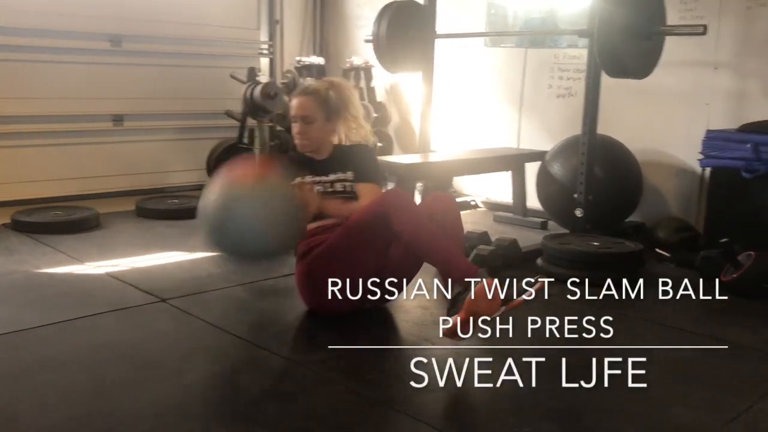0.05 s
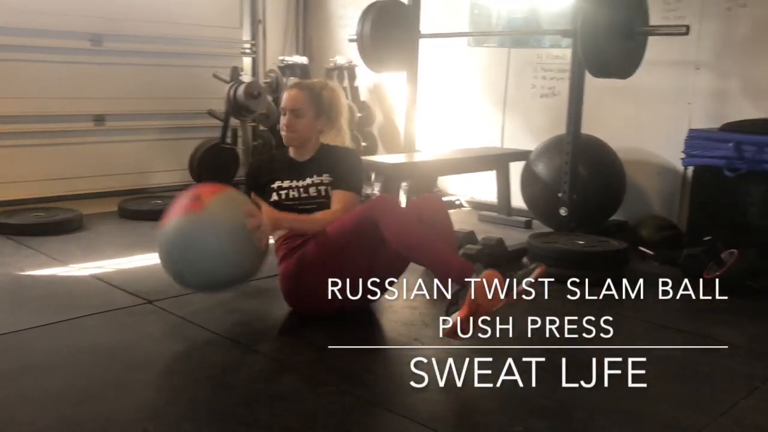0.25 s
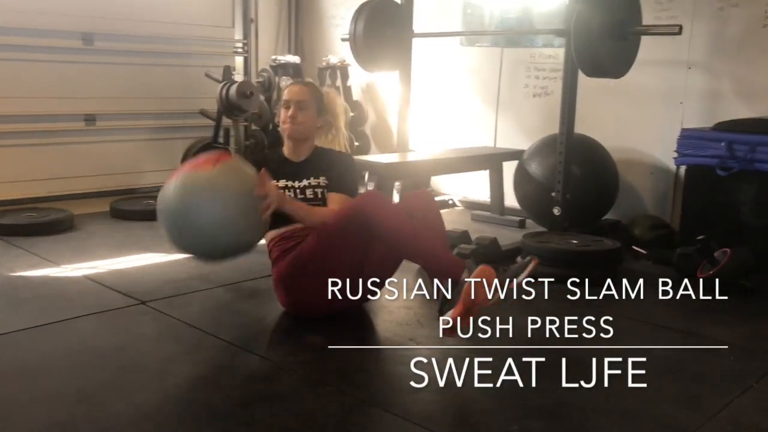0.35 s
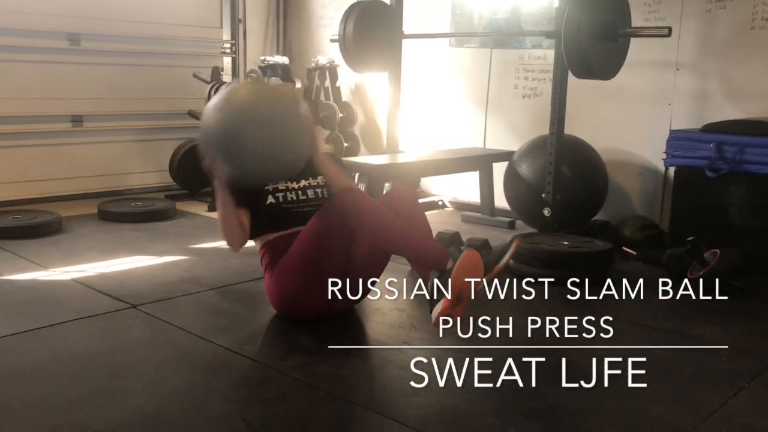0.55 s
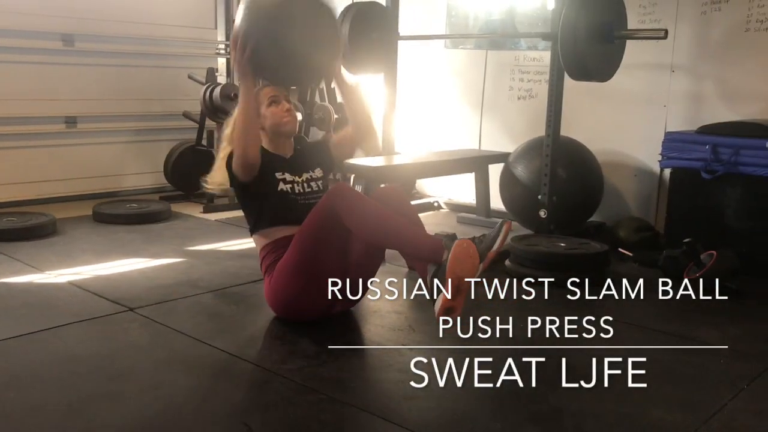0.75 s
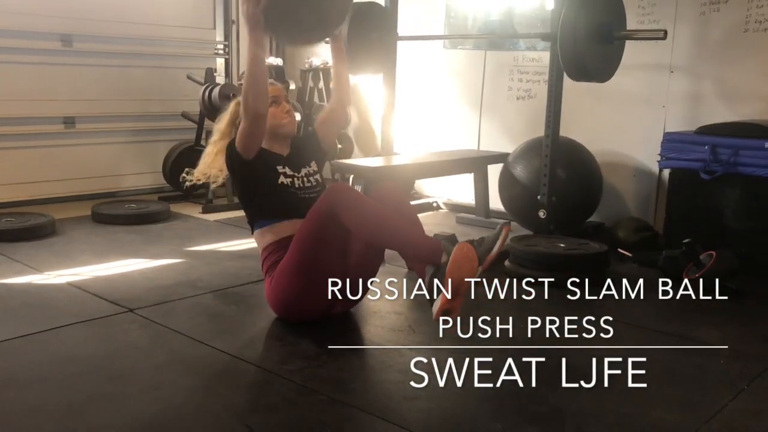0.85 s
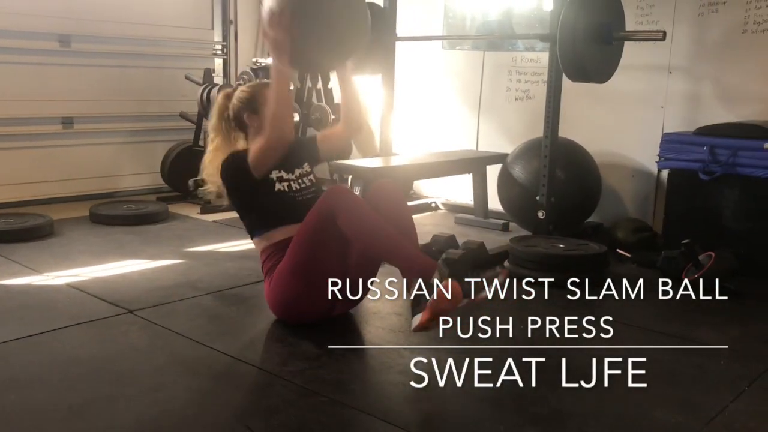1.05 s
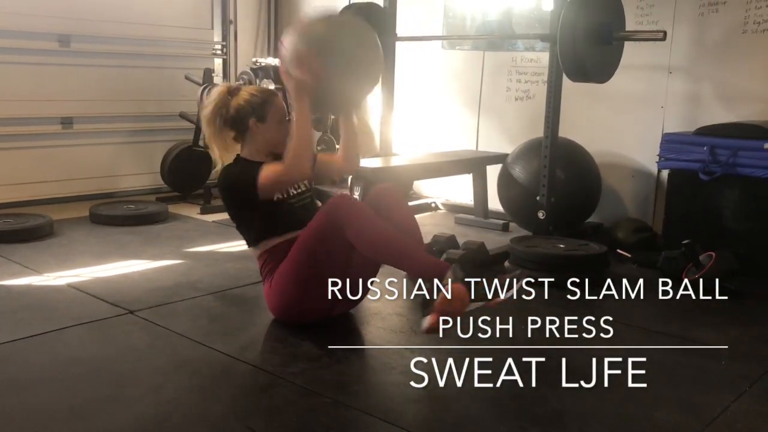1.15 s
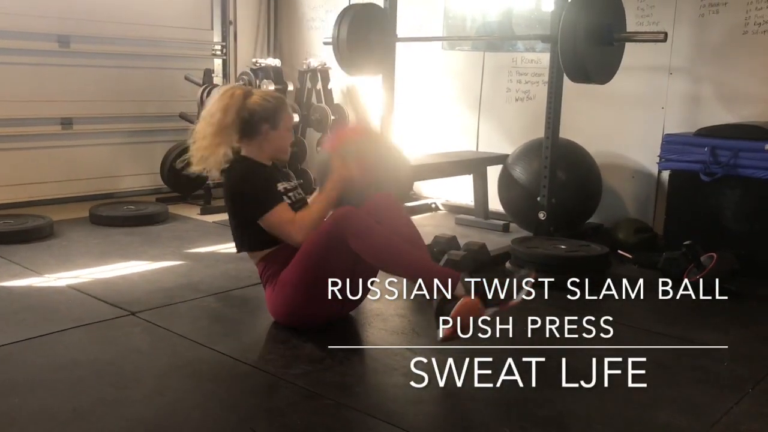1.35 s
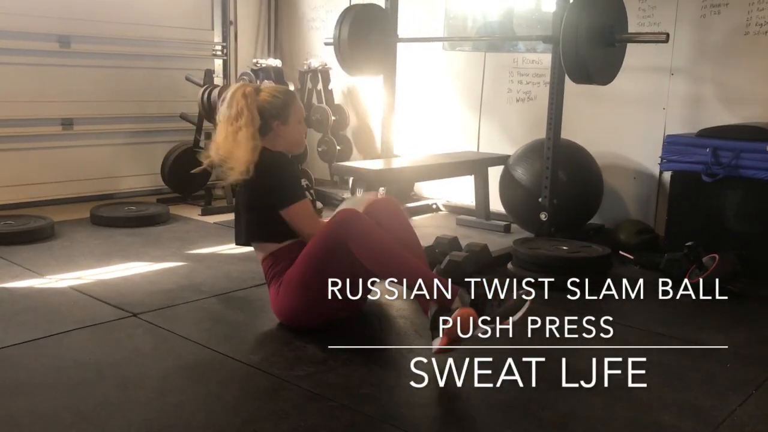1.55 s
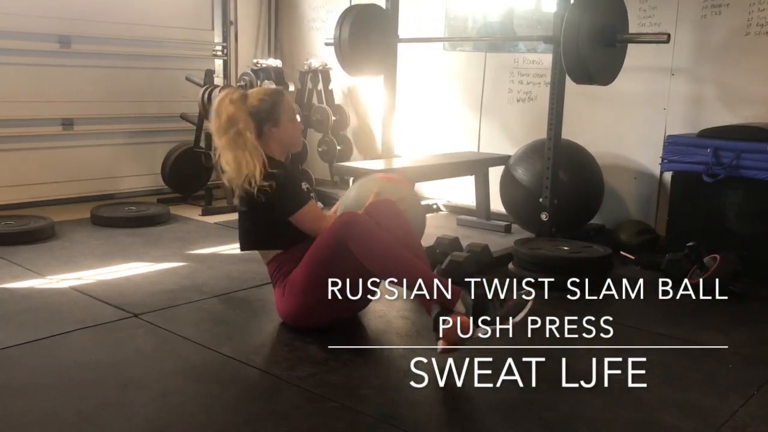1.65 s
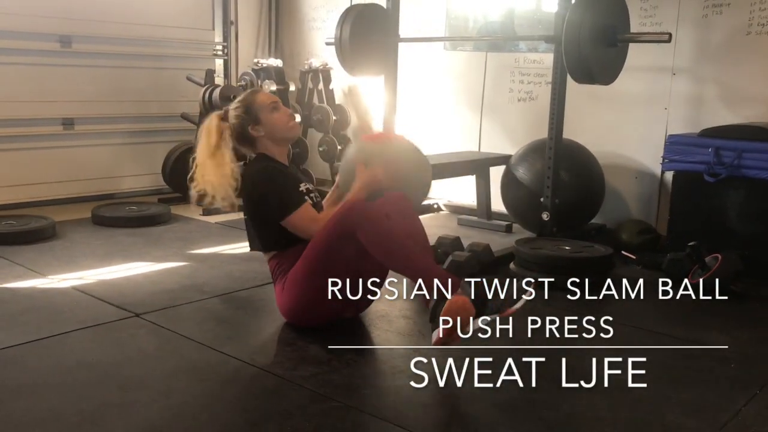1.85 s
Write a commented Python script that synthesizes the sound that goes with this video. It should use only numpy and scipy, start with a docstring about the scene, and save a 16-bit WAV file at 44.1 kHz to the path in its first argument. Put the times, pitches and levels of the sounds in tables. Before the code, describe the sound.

A heavy sand-filled ball slams onto a rubber-matted concrete floor at about 0.2 seconds: a sharp crackling slap, quick echoes, a low thud and a garage tail fading over half a second. Very soft hand shuffles come near 0.9 and 1.2 seconds, then a faint rub before a second, slightly duller slam at 1.6 seconds. Low room rumble, faint hum and phone microphone hiss lie beneath.

```python
"""Two slams of a sand-filled ball

A heavy ball is slammed twice on a rubber-matted concrete floor in a garage gym.
Each slam is a sharp resonant slap with echoes and crackle, then a low thud: one push plus fading sine tones.
Noise that builds up and fades at its own speed in each band makes the long garage tail.
Shaped noise makes the soft handling, a tick and a rub; a wavering sine makes the mains hum.
Steady noise adds room rumble, microphone hiss and a faint whine, and the treble hiss steps up at times."""
import sys
import numpy as np
from scipy import signal
from scipy.fft import rfft, irfft, next_fast_len
from scipy.io import wavfile
from scipy.ndimage import uniform_filter1d

SR = 44100
rng = np.random.default_rng(int(sys.argv[2]) if len(sys.argv) > 2 else 0)


def to_wav(sig):
    """Store sig (one row per channel, or 1-D mono) as 16-bit WAV at the path in sys.argv[1].

    Samples outside -1..1 are clipped; the rate is SR.
    """
    pcm = np.clip(np.atleast_2d(sig), -1, 1) * 32767
    pcm = np.round(pcm).astype(np.int16)
    wavfile.write(sys.argv[1], SR, pcm.T)  # frames by channels


def gain_from_db(level_db):
    """Turn a decibel level (scalar or array-like) into a linear amplitude factor."""
    decades = np.asarray(level_db, float) / 20
    return 10 ** decades


N = 83790
T = np.arange(N) / SR  # time [s]


def unit(x):
    """Scales a sound to an rms of 1."""
    return x / np.sqrt(np.mean(x ** 2) + 1e-20)


def along(points, hz):
    """Reads a value between (frequency [Hz], value) points, on a log frequency axis."""
    f, v = np.transpose(points)
    return np.interp(np.log(hz + 1), np.log(f + 1), v)


def filtered(x, response):
    """Multiplies the spectrum of x by a response, which is a function of frequency."""
    size = next_fast_len(N + 8192)  # spare room at the end for ringing
    spectrum = rfft(x, size) * response(np.fft.rfftfreq(size, 1 / SR))
    return irfft(spectrum, size)[:N]


def white():
    """Noise with equal power at every frequency."""
    return rng.standard_normal(N)


def noise(colour):
    """Noise of rms 1 with the colour given by (frequency [Hz], relative level [dB]) points."""
    return unit(filtered(white(), lambda hz: gain_from_db(along(colour, hz))))


def swell(start, rise, t60):
    """Silence, a rise with time constant rise [s], and a fade that loses 60 dB in t60 [s]."""
    t = np.maximum(T - start, 0)
    return (1 - np.exp(-t / np.abs(rise))) * gain_from_db(-60 * t / np.abs(t60))


def resonances(rows):
    """Ringing peaks from (centre [Hz], width [Hz], level [dB]) rows, with alternating signs."""
    def response(f):
        total = 0
        for k, (centre, width, db) in enumerate(rows):
            peak = 1j * f * width / (centre * centre - f * f + 1j * f * width)
            total = total + (-1) ** k * gain_from_db(db) * peak
        return total
    return response


# The two slams; the thuds and tails below use this table too:
# (time [s], slap peak level [dB], slap centre [Hz], width of each of its two equal resonances [Hz],
#  tail level [dB], push peak level [dB], lag of the push [s])
SLAM_EVENTS = [(0.2208, -9, 2384, 4070, -25, -17, .0103), (1.5798, -8.5, 3386, 5184, -28, -20, .0190)]
# Hard echoes of the slap off near walls and gear:
# (slam number from 0, delay after the slam time [s], level relative to the slap [dB])
SLAP_ECHOES = [(0, .0021, -13), (0, .0047, -13), (0, .0093, -10), (0, .0370, -18), (1, .0038, -7),
               (1, .0096, -15), (1, .0148, -11)]


def slaps():
    """The skin snaps through two equal resonances in a row, with echoes and a brief crackle."""
    crackle_db, crackle_t60_s = -20.5, 0.016  # skin and filling settle; level relative to the slap peak
    click = np.eye(1, N)[0]  # a single sample
    out = np.zeros(N)
    for k, (start, db, hz, width, *_) in enumerate(SLAM_EVENTS):
        copies = [(0.00021, 0)]  # the slap itself: (delay [s], level [dB])
        copies += [(delay, loss) for which, delay, loss in SLAP_ECHOES if round(which) == k]

        def slap_response(f):
            spikes = sum(gain_from_db(loss) * np.exp(-2j * np.pi * f * (start + delay)) for delay, loss in copies)
            return -spikes * resonances([(hz, width, 0)])(f) ** 2

        snap = filtered(click, slap_response)
        crackle = noise([(500, -20), (hz, 0), (9000, -6), (16000, -16)])
        crackle = crackle * swell(start, 0.00015, crackle_t60_s)
        out += gain_from_db(db) * (snap / np.abs(snap).max() + gain_from_db(crackle_db) * crackle)
    return out


# Ringing modes of floor, room and ball skin:
# (frequency [Hz], level in the first slam [dB], level in the second slam [dB], 60 dB fade time [s])
THUD_MODES = [(50, -30.5, -34, 0.61), (62.8, -28, -30, 0.68), (82, -29, -28.5, 0.2),
              (161.5, -40.5, -32.5, 0.52), (190, -37.5, -22.5, 0.25), (224.5, -35, -42.5, 0.79),
              (248, -24, -46, .6), (289, -28.5, -40.5, 0.57), (344.3, -31.5, -36.5, 0.56),
              (415.6, -27.5, -36, 0.13), (655, -25, -33, 0.17), (1078, -25.5, -43, 0.09),
              (1632, -24.5, -58, 0.04), (2800, -28, -42, 0.055), (8700, -22.5, -56, 0.0086),
              (13200, -26.5, -51, .008)]


def thuds():
    """The weight pushes the floor once; modes swing roughly in step with it, high ones rising faster."""
    push_s = 0.00414  # length of the push into the floor
    slowest_rise_s = 0.0027
    phase_scatter = 0.5  # standard deviation [radians]
    out = np.zeros(N)
    for k, (start, *_, push_db, lag) in enumerate(SLAM_EVENTS):
        u = (T - start - lag) / push_s  # runs from 0 to 1 during the push
        out -= gain_from_db(push_db) * np.sin(2 * np.pi * u) * (u > 0) * (u < 1)
        slips = rng.normal(0, phase_scatter, len(THUD_MODES))
        for (hz, *db, t60), slip in zip(THUD_MODES, slips):
            phase = 2 * np.pi * hz * (T - start - lag - push_s / 2) + slip
            rise = min(slowest_rise_s, 2 / hz)
            out += gain_from_db(db[k]) * np.sin(phase) * swell(start, rise, t60)
    return out


# Colour of the tail, one list for each slam: (frequency [Hz], relative level [dB])
TAIL_COLOURS = [
    [(18, -46), (40, -21.5), (200, -11), (480, -17.5), (660, -17), (790, -17.5), (1600, -22), (9500, -40),
     (16000, -45)],
    [(18, -32), (40, -10.5), (130, -14.5), (300, -14), (700, -15), (1200, -19), (4500, -25), (16000, -45)],
]
# How long the garage rings: (frequency [Hz], 60 dB fade time [s])
GARAGE_FADE = [(60, 0.99), (250, 0.74), (1000, 0.61), (3000, 0.54), (7000, 0.45), (12000, 0.38),
               (16000, 0.38)]
# How fast the tail builds up: (frequency [Hz], rise time constant [s])
GARAGE_BUILD = [(60, 0.014), (300, 0.0055), (1500, 0.0013), (8000, 0.0016)]


def tails():
    """The garage answers each slam: every half-octave step builds up and dies at its own speed."""
    out = np.zeros(N)
    centres = 30 * 2. ** np.arange(0, 9.5, .5)  # [Hz]
    for (start, *_, db, _, _), colour in zip(SLAM_EVENTS, TAIL_COLOURS):
        rush = noise(colour)
        for c in centres:
            # overlapping triangles, half an octave to each side
            band = filtered(rush, lambda f: np.clip(1 - 2 * np.abs(np.log2((f + 1) / c)), 0, 1))
            out += gain_from_db(db) * band * swell(start, along(GARAGE_BUILD, c), along(GARAGE_FADE, c))
    return out


# Soft handling of the ball:
# (time [s], level [dB], rise time constant [s], 60 dB fade time [s], top of the dull sound [Hz])
HAND_SWELLS = [(0.119, -53.5, 0.039, 0.67, 1406), (.94, -55, 0.037, 0.62, 850),
               (1.205, -54.5, 0.029, 0.39, 928), (1.481, -56, 0.028, 0.8, 690)]


def hand_swells():
    """Hands shift the ball: dull noise that swells and fades."""
    out = np.zeros(N)
    for start, db, rise, t60, top_hz in HAND_SWELLS:
        colour = [(85, -20), (130, -2), (200, 0), (300, -4), (450, -12),
                  (top_hz, -12), (3 * top_hz, -25), (16000, -50)]
        out += gain_from_db(db) * noise(colour) * swell(start, rise, t60)
    return out


# Resonances of the ball's skin during the rub: (centre [Hz], width [Hz], relative level [dB])
RUB_RESONANCES = [(360, 110, 0), (1030, 220, 0), (2600, 1500, -17)]


def rub():
    """A rub heard through the skin's resonances, starting just ahead of the second slam."""
    start_s, level_db, t60_s = 1.538, -49, 0.8
    rubbing = unit(filtered(white(), lambda f: resonances(RUB_RESONANCES)(f) / (1 + (f / 6000) ** 2)))
    return gain_from_db(level_db) * rubbing * swell(start_s, 0.0046, t60_s)


def tick():
    """One small handling tick: a brief burst of noise around one frequency."""
    start_s, level_db, centre_hz, t60_s = 0.133, -60, 2800, 0.03
    burst = noise([(1500, -30), (centre_hz, 0), (4500, -30)])
    return gain_from_db(level_db) * burst * swell(start_s, 0.0015, t60_s)


def hum():
    """Mains hum: a low sine whose level wavers slowly at random."""
    hum_hz, level_db, waver_db = 59, -70, 1.5
    waver = unit(filtered(white(), lambda f: 1 / (1 + (f / 8) ** 2)))
    return gain_from_db(level_db + waver_db * waver) * np.sqrt(2) * np.sin(2 * np.pi * hum_hz * T)


def whine():
    """A faint narrow whine: noise through two equal resonances in a row."""
    centre_hz, width_hz, level_db = 13600, 150, -92.5  # width of each resonance
    narrow = unit(filtered(white(), lambda f: resonances([(centre_hz, width_hz, 0)])(f) ** 2))
    return gain_from_db(level_db) * narrow


# Colour of the steady rumble and hiss: (frequency [Hz], relative level [dB])
FLOOR_COLOUR = [(15, -39.5), (25, -7.5), (75, -1.5), (169, -14), (340, -16), (482, -20), (895, -22),
                (1300, -27), (4150, -30), (15500, -40)]


def noise_floor():
    """Room rumble and microphone hiss as one steady noise, strongest in the bass."""
    return gain_from_db(-66.5) * noise(FLOOR_COLOUR)


# Spells in which the treble hiss steps up: (start [s], end [s], level of the added hiss [dB])
HISS_SPELLS = [(0.146, 0.643, -72.5), (.945, 0.997, -85), (1.55, 1.896, -70.5)]
# Colour of the added hiss: (frequency [Hz], relative level [dB])
HISS_COLOUR = [(1500, -28), (4000, 5), (8000, 0.5), (10500, -1), (13500, -0.5), (16000, -6.5)]


def treble_hiss():
    """Extra treble noise that steps in and out with softened edges."""
    steps = sum(gain_from_db(db) * (T > start) * (T < end) for start, end, db in HISS_SPELLS)
    return uniform_filter1d(steps, size=300) * noise(HISS_COLOUR)


def scene():
    """Adds up the slams, the handling and the background as one channel."""
    slams = slaps() + thuds() + tails()
    handling = hand_swells() + rub() + tick()
    background = hum() + whine() + noise_floor() + treble_hiss()
    return (slams + handling + background)[None]


def band_limit(x):
    """A steep low-pass at the top of the band."""
    return signal.sosfilt(signal.butter(12, 17030, fs=SR, output="sos"), x)


def record(dry):
    """The phone's microphone drops the deep bass and the extreme treble."""
    low_hz, top_hz = 45, 15800

    def microphone(f):
        bass_cut = (1j * f / (low_hz + 1j * f)) ** 2
        return bass_cut * np.where(f < top_hz, 1, gain_from_db(-38))

    mix = filtered(dry[0], microphone)[None]
    return band_limit(mix)


dry = scene()
out = record(dry)
to_wav(out)
```